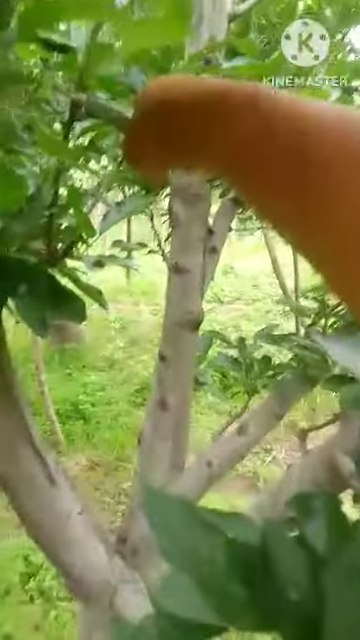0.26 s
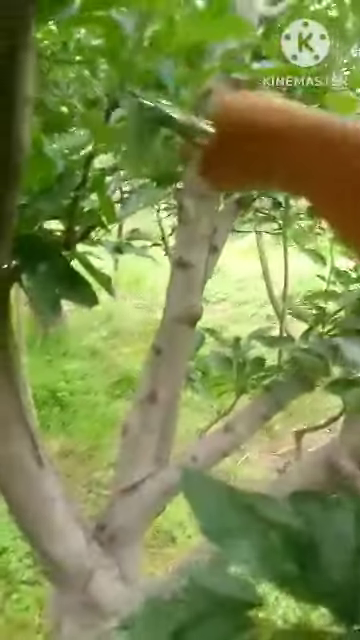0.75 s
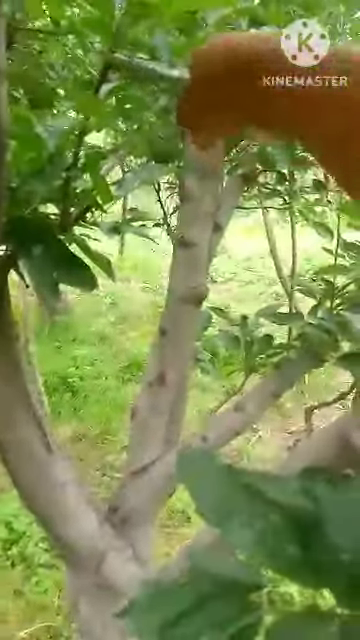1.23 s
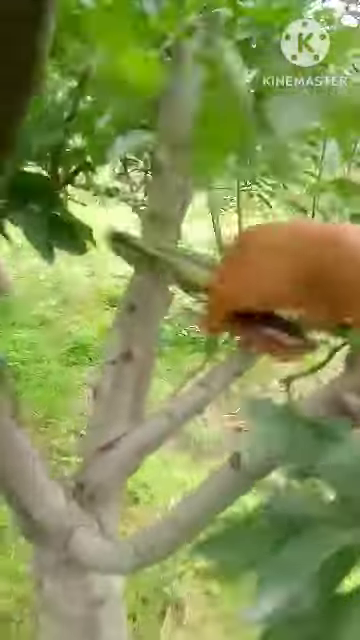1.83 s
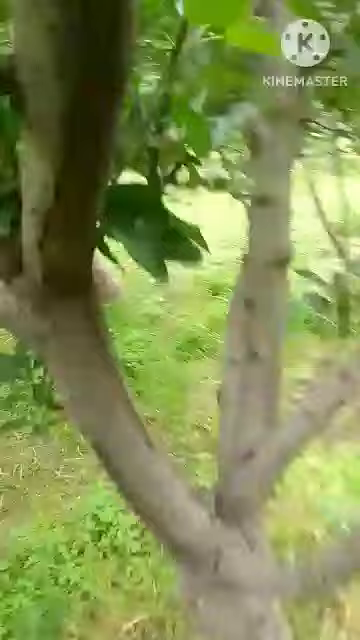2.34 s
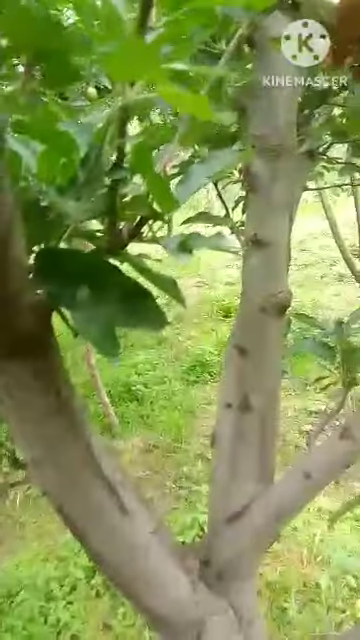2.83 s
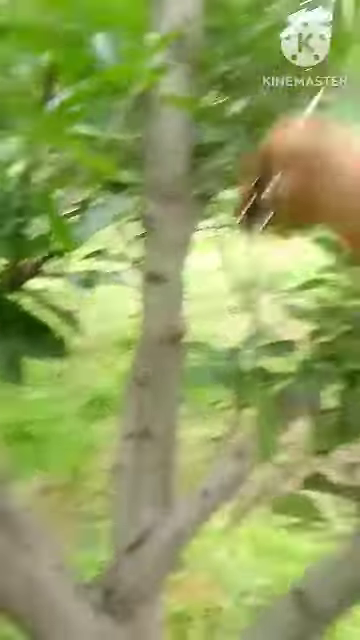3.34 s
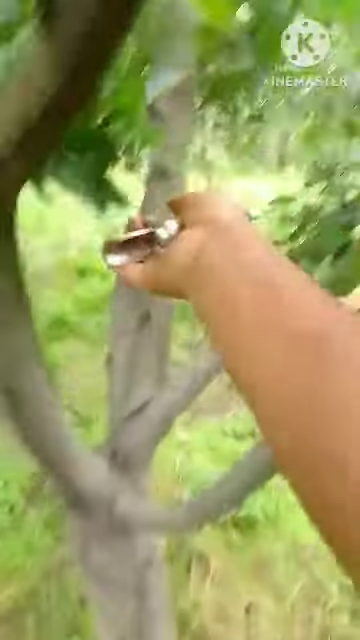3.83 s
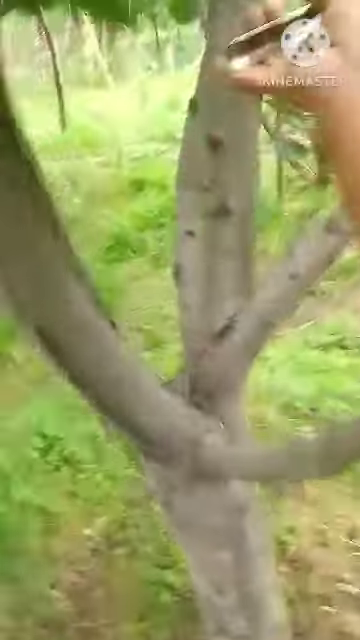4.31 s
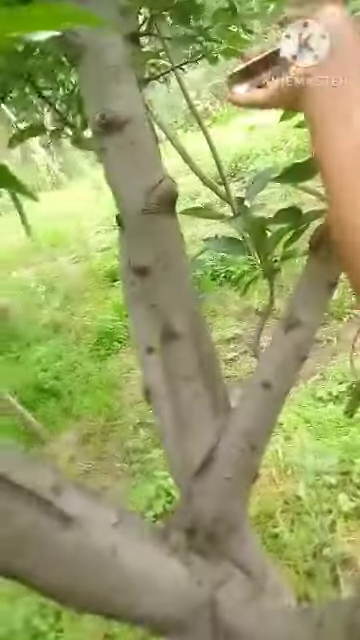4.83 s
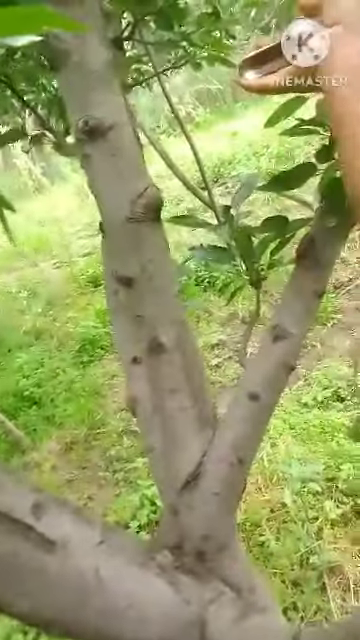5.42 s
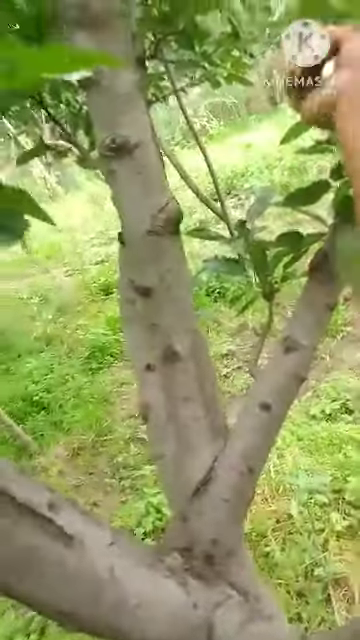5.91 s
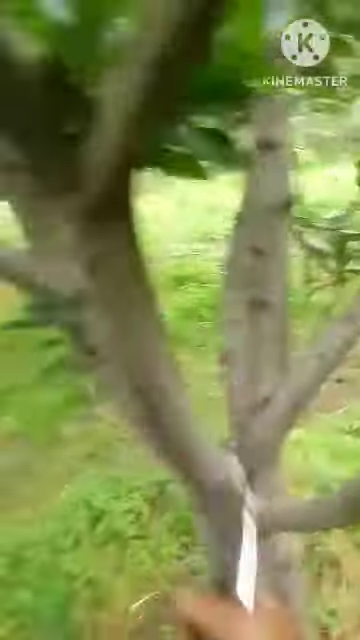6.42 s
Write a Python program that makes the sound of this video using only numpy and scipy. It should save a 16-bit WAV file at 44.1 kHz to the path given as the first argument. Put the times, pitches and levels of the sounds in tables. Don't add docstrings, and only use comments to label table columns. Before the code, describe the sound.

Close to a small microphone in a quiet orchard, pruning shears make three separate snips. Each begins with a creaking bite, claps shut in a hard, briefly ringing steel click, then scrapes open with spring hiss. Leaves rustle and twigs tick between them, wind puffs softly, and a palm rubs the microphone after the second cut. Behind is a faint wash and broad drone, with a tiny cricket chirp, then a faint dove and fly near the end.

```python
import sys
import numpy as np
from scipy import signal
from scipy.fft import rfft, irfft
from scipy.io import wavfile
from scipy.ndimage import uniform_filter1d

SR = 44100
rng = np.random.default_rng(int(sys.argv[2]) if len(sys.argv) > 2 else 0)


def boost_factor(decibels):
    exponent = np.asarray(decibels, float) / 20
    return 10 ** exponent


def wav_out(sig):
    wavfile.write(sys.argv[1], SR, np.round(np.clip(np.atleast_2d(sig).T, -1, 1) * 32767).astype(np.int16))


N = 293706
TIME = np.arange(N) / SR


def evened(x):
    return x / np.sqrt(np.mean(x ** 2) + 1e-20)


def along(rows, column=1):
    rows = np.asarray(rows)
    return np.interp(TIME, rows[:, 0], rows[:, column])


def level(rows, column=1):
    edge = np.minimum(TIME - rows[0][0], rows[-1][0] - TIME)
    return boost_factor(along(rows, column)) * np.clip(edge * 200, 0, 1)


def swells(rows, column=3):
    end_db = -20
    power = 0
    for row in rows:
        u = TIME - row[0]
        shape = np.where(u < 0, -u / row[1], (u / row[2]) ** 2)
        power = power + boost_factor(2 * row[column] + 2 * end_db * shape)
    return np.sqrt(power)


def wavering(size, count=N):
    once = uniform_filter1d(rng.standard_normal(count), size=size)
    return evened(uniform_filter1d(once, size=size))


def add(mix, s, sound):
    part = mix[round(s * SR):][:len(sound)]
    part += sound[:len(part)]


def resonate(x, hz, width):
    turn = np.exp(2j * np.pi * np.cumsum(hz * np.ones(len(x))) / SR)
    r = np.exp(-np.pi * width / SR)
    return 2 * (turn * signal.lfilter([1 - r], [1, -r], x / turn)).real


def resonate_twice(x, hz, width):
    return resonate(resonate(x, hz, width), hz, width)


def grains(per_s, spread_db):
    size = boost_factor(spread_db * np.minimum(rng.exponential(1, N), 4)) * rng.choice([-1., 1.], N)
    return evened(size * (rng.random(N) < per_s / SR))


def coloured(x, colour):
    f, db = np.transpose(colour)
    hz = np.fft.rfftfreq(N, 1 / SR)
    gain_db = np.interp(np.log(hz + 1), np.log(f), db, db[0] - 13.5, db[-1])
    return evened(irfft(rfft(x) * boost_factor(gain_db), N))


def hiss(colour, patchy_db, flicker_db):
    frames = N // 64 + 6
    a, b, patches = rng.standard_normal((frames, 129, 3)).T
    patches = evened(uniform_filter1d(uniform_filter1d(patches, size=4, axis=0), size=40, axis=1))
    flicker = evened(uniform_filter1d(rng.standard_normal(frames), size=6))
    z = (a + 1j * b) * boost_factor(patchy_db * patches + flicker_db * flicker)
    return coloured(signal.istft(z, nperseg=256, noverlap=192)[1][:N], colour)


def band(lo_hz, hi_hz):
    sos = signal.butter(4, [lo_hz, hi_hz], "band", fs=SR, output="sos")
    return evened(signal.sosfilt(sos, rng.standard_normal(N)))


def brief_dip(db):
    centre_s, length_s = 3.37, 0.076
    return boost_factor(db * np.exp(-((TIME - centre_s) / length_s) ** 2))


# (frequency [Hz], level [dB])
WASH_COLOUR = [(60, -3), (150, -0.5), (300, -2), (500, -1), (800, -4), (1600, -9.5), (4000, -21),
               (9000, -38)]
# (time [s], level [dB])
DRONE = [(0.0, -63), (1.9, -62), (3.1, -62.5), (3.6, -72.5), (4.5, -71), (5.3, -66.5), (5.8, -70),
         (6.4, -69), (6.66, -61.5)]
# (peak [s], rise [s], fall [s], low level [dB], middle level [dB])
SHOOT_FALLS = [
    (6.11, 0.22, 0.12, -53, -55.5),
]


def distance():
    drone_hz, width_hz = 1300, 410
    hz = drone_hz * (1 + 0.052 * wavering(size=4000))
    drone = resonate_twice(rng.standard_normal(N), hz, width_hz) * boost_factor(1.4 * wavering(size=1500))
    wash = hiss(WASH_COLOUR, patchy_db=0.8, flicker_db=0.8)
    drone_db = along(DRONE)
    wash_db = -61.5 + 0.26 * (drone_db - DRONE[0][1])
    low = np.hypot(boost_factor(wash_db) * brief_dip(-7.5), swells(SHOOT_FALLS))
    middle = np.hypot(boost_factor(drone_db), swells(SHOOT_FALLS, column=4))
    return low * wash + middle * evened(drone)


def faint_tone(rows, width_hz):
    hz = along(rows)
    tone = np.sqrt(2) * np.sin(2 * np.pi * np.cumsum(hz) / SR)
    fuzz = evened(resonate(rng.standard_normal(N), hz, width_hz))
    return level(rows, column=2) * (0.94 * tone + 0.59 * fuzz)


# (time [s], pitch [Hz], level [dB])
DOVE = [(5.68, 600, -73), (5.74, 610, -66), (5.9, 598, -69), (6.0, 596, -64)]


def dove():
    return faint_tone(DOVE, 15)


# (time [s], wingbeat [Hz], level [dB])
FLY = [(5.76, 171, -71), (5.936, 185.6, -66), (6.05, 175.1, -71), (6.4, 168, -69.5), (6.66, 164, -66)]


def fly():
    return faint_tone(FLY, 15)


def cricket():
    out, t = np.zeros(N), np.arange(150) / SR
    pip = boost_factor(-61.5) * np.hanning(len(t)) * np.sin(2 * np.pi * 6600 * t)
    for start_s, gap_s in ((2.385, 0.013), (2.49, 0.014)):
        for stroke in range(6):
            add(out, start_s + gap_s * (stroke + rng.uniform(-.2, .2)), pip)
    return out


# (time [s], level [dB])
BREEZE = [(0.0, -70), (2.3, -69), (2.6, -66), (3.2, -66), (4.5, -73), (5.6, -70.5), (6.66, -71)]
# (peak [s], rise [s], fall [s], level [dB])
GUSTS = [(.85, .6, 0.13, -65), (2.06, 0.18, .08, -61), (2.19, 0.14, 0.24, -60.5), (6.07, 0.37, 0.38, -70),
         (6.47, 0.18, 0.18, -57)]


def wind():
    colour = [(12, -19.5), (40, -5.5), (90, -8.5), (200, -13.5), (500, -43.0), (2000, -65.5)]  # (Hz, dB)
    puffs = coloured(rng.standard_normal(N), colour)
    return np.hypot(boost_factor(along(BREEZE)), swells(GUSTS)) * brief_dip(-14.5) * puffs


# (time [s], rustle level [dB])
RUSTLE = [(0.0, -64), (0.37, -65), (1.65, -63.5), (1.8, -63.5), (2.24, -55), (2.35, -59.5), (2.99, -62.5),
          (3.21, -62), (3.45, -60.5), (3.69, -56), (3.89, -63), (5.01, -66), (5.27, -64.5), (5.67, -67),
          (5.97, -65), (6.14, -61.5), (6.45, -59.5), (6.66, -56.5)]
# (peak [s], rise [s], fall [s], level
# [dB])
SWISHES = [(1.63, 0.054, 0.045, -76), (1.712, 0.013, .012, -67), (1.72, 0.067, 0.082, -66),
           (1.79, .08, 0.22, -71), (2.145, 0.036, 0.17, -69), (2.51, 0.12, .1, -78),
           (2.664, 0.25, 0.19, -73), (2.8, 0.065, .03, -72), (2.87, 0.032, 0.033, -66),
           (2.93, .03, .03, -75), (3.196, .008, .012, -78), (3.218, 0.0087, .012, -68),
           (3.26, .01, 0.014, -50), (3.28, 0.033, 0.12, -69), (3.392, .015, 0.054, -71),
           (3.544, 0.067, 0.2, -65.5), (3.8, .25, .13, -73), (4.012, .012, .07, -76),
           (4.802, 0.035, 0.021, -77), (6.035, 0.016, 0.037, -59.5), (6.14, 0.18, .06, -71),
           (6.22, .03, 0.09, -77), (6.45, .3, 0.59, -96)]
# (frequency [Hz], level [dB])
BODY_COLOUR = [(500, -18), (1200, -2.5), (2200, -0.5), (3500, 0.5), (4800, -2), (6000, -16), (9000, -27)]
EDGE_COLOUR = [(3500, -20), (6000, 3), (8000, -3.5), (10000, -8), (13000, -22), (15500, -24)]
SWISH_COLOUR = [(5000, -16), (8000, 3), (10000, -8.5), (12500, -1.5), (14000, -1.5), (15500, -8)]


def foliage():
    body = hiss(BODY_COLOUR, patchy_db=1.5, flicker_db=2.0)
    body = body + 0.27 * coloured(grains(per_s=130, spread_db=7.5), BODY_COLOUR)
    edge = hiss(EDGE_COLOUR, patchy_db=0.7, flicker_db=3.0)
    edge = edge + 0.22 * coloured(grains(per_s=80, spread_db=6.5), EDGE_COLOUR)
    sheen = hiss(SWISH_COLOUR, patchy_db=4.0, flicker_db=1.5)
    rustle_db, swish = along(RUSTLE), swells(SWISHES)
    edge_db = -79.5 + 0.86 * (rustle_db - rustle_db[0])
    brushing = np.hypot(boost_factor(edge_db), boost_factor(1.5) * swish)
    return boost_factor(rustle_db) * body + brushing * edge + swish * sheen


# (time [s], peak level [dB], pitch [Hz], share above 5 kHz [dB])
LEAF_TICKS = [(0.167, -41, 2050, -26), (0.2274, -48, 4400, -16), (0.5478, -43.5, 2850, -18),
              (0.636, -40, 3250, -20), (1.1461, -41.5, 4000, -28), (1.2832, -49, 6300, -8),
              (1.333, -50, 5160, -18), (1.4206, -37, 2530, -36), (1.458, -43, 3860, -27),
              (1.6132, -43, 4300, -16), (1.627, -44.5, 2690, -12), (1.89, -41, 2810, -13),
              (2.011, -43.5, 3320, -17.5), (2.062, -40, 4120, -15.5), (2.15, -46.5, 4120, -6),
              (2.185, -39.5, 4140, -20), (2.2874, -45, 4430, -12), (2.843, -41, 4040, 2),
              (2.8697, -42, 2220, -7), (2.920, -39.5, 3950, -18), (3.3938, -50, 1970, 3),
              (3.5212, -39, 1700, -6), (3.557, -38, 2420, -16), (3.899, -47, 1900, -13),
              (1.52, -50, 3900, -20), (0.107, -45, 3500, -21), (4.6295, -42.5, 3800, -32),
              (4.874, -44, 1490, -30), (3.57, -40, 3050, -11), (3.6084, -37, 2060, -22),
              (3.666, -41, 2600, -13), (3.759, -36.5, 3700, -22), (4.6287, -40.5, 2190, -37.5),
              (5.4156, -44, 3210, -30), (5.7295, -43.5, 2530, -33.5), (6.3944, -46, 2400, -19)]
# (time [s], peak level [dB], pitch [Hz])
TWIG_KNOCKS = [(0.087, -40, 526), (0.634, -42.5, 1000), (1.457, -40, 1450), (2.163, -43, 1450),
               (2.273, -45, 420), (2.332, -38.5, 1370), (2.338, -38.5, 1250), (2.364, -42, 1250),
               (2.369, -42, 1600), (2.443, -42, 1240), (2.646, -39, 1310), (2.011, -42, 1160),
               (3.521, -41, 215), (3.538, -44, 480), (3.548, -44, 250), (3.607, -41.5, 856),
               (3.613, -50.5, 260), (4.788, -49, 900), (4.809, -44, 1400), (4.816, -50, 1300),
               (4.629, -48, 1000), (5.414, -41.5, 1227)]


def ticks():
    rows = [(*tick, 0.011) for tick in LEAF_TICKS]
    rows += [(*knock, -37, 0.025) for knock in TWIG_KNOCKS]
    out, t = np.zeros(N), np.arange(1200) / SR
    snaps, edges = band(1050, 4200), band(7350, 9060)
    onset = np.sin(np.pi / 2 * np.minimum(t / 0.00033, 1)) ** 2
    for (s, db, hz, bright_db, t60), chance in zip(rows, rng.random((len(rows), 10))):
        ring = 0
        for k, (shift, phase) in enumerate(chance.reshape(5, 2)):
            octaves = 0.8 * ((k + shift) / 5 - .5)
            ring = ring + np.sin(2 * np.pi * (hz * 2 ** octaves * t + phase))
        now = slice(round(s * SR), round(s * SR) + len(t))
        snap = (0.4 * snaps[now] + boost_factor(bright_db) * edges[now]) * np.exp(-t / 0.0023)
        sound = (ring / 2 + snap) * boost_factor(-60 * t / t60) * onset
        add(out, s, boost_factor(db) * sound / abs(sound).max())
    return out


# (peak [s], rise [s], fall [s], level [dB])
HAND_SHIFTS = [(3.352, .025, .045, -56), (3.415, .035, .05, -56), (3.44, .1, .06, -61),
               (3.495, .05, .04, -56), (3.53, .045, .05, -52.5)]
# (time [s], frequency [Hz])
HAND_PITCH = [
    (3.45, 281.6),
    (3.55, 223),
]


def handling():
    hz = along(HAND_PITCH)
    rub = evened(resonate_twice(grains(per_s=3000, spread_db=1.5), hz, 170))
    hum = np.sin(2 * np.pi * np.cumsum(hz) / SR)
    return swells(HAND_SHIFTS) * (.55 * rub + 0.59 * hum)


# (peak [s], rise [s], fall [s], level [dB])
SPRING_SLIDES = [
    (3.275, .012, 0.25, -66.5),
    (3.56, 0.047, 0.32, -59.5),
    (3.635, 0.064, 0.069, -60),
    (6.12, 0.13, 0.097, -60.5),
]
# (frequency [Hz], width [Hz], level [dB])
COIL = [(8950, 600, 6), (9000, 520, -5)]
# (time [s], level [dB], pitch [Hz])
BOLT_SQUEAL = [(6.065, -82, 13150), (6.12, -71, 13150), (6.185, -77, 13150), (6.24, -85, 13000)]


def spring():
    scrape = grains(per_s=1400, spread_db=3.5)
    tone = sum(boost_factor(db) * resonate_twice(scrape, hz, width) for hz, width, db in COIL)
    squeal = resonate(grains(per_s=900, spread_db=2.0), along(BOLT_SQUEAL, column=2), 70)
    return evened(tone) * swells(SPRING_SLIDES) + level(BOLT_SQUEAL) * evened(squeal)


# (centre [s], length [s], peak level [dB], pitch [Hz])
JOLTS = [(1.712, 0.011, -32.5, 370), (1.7125, 0.0073, -37, 900), (1.723, .01, -46, 380),
         (3.2607, .009, -34, 443), (3.261, 0.015, -44.5, 179), (6.0222, 0.0069, -33, 480),
         (6.021, 0.0071, -38.5, 870), (6.028, .008, -47, 500), (6.098, .008, -46, 453),
         (6.134, 0.0071, -47, 500)]


def jolts():
    out = np.zeros(N)
    for s, length, db, hz in JOLTS:
        t = np.arange(-length / 2, length / 2, 1 / SR)
        push = np.cos(np.pi * t / length) ** 2 * np.cos(2 * np.pi * hz * t)
        add(out, s - length / 2, boost_factor(db) * push)
    return out


# (peak [s], rise [s], fall [s], rub at handle end [dB], rub at tip [dB])
RUBS = [
    [(1.68, 0.023, 0.031, -56, -41), (1.705, 0.039, 0.026, -39, -45), (1.73, .03, 0.17, -49, -52.5),
     (1.87, .07, 0.073, -53.5, -59.5)],
    [(3.2, 0.02, .03, -54.5, -50.5), (3.252, 0.013, 0.026, -40, -35), (3.28, .035, 0.12, -52, -50),
     (3.33, .06, 0.16, -62, -59.5)],
    [(5.992, 0.0085, 0.033, -50, -46.5), (6.025, 0.012, 0.061, -42, -46), (6.06, .04, 0.16, -51.5, -55),
     (6.115, .07, 0.055, -58, -49.5)],
]
# (frequency [Hz], width [Hz], level [dB])
SLIDE_MODES = [
    [(1810, 210, -5), (2400, 225, -1.5), (2600, 240, -1), (2950, 240, -0.5), (3740, 300, 1),
     (4080, 260, 0.5), (4500, 330, -2), (4920, 320, -5)],
    [(1730, 280, 0.5), (2070, 280, 2), (2490, 287, -2), (2800, 260, -3), (3500, 300, -2.5), (3900, 350, 1),
     (4410, 300, -0.5), (4800, 280, 1), (5150, 300, -1), (5700, 400, -9)],
    [(1920, 240, 1), (2300, 200, -6), (2540, 200, -3), (2920, 180, 1), (3600, 350, -9), (4140, 250, -8),
     (4540, 290, 0), (4750, 200, -2), (5240, 250, -13)],
]


def rubbing(rub, slide):
    out, first = np.zeros(N), round(rub[0][0] * SR)
    now = slice(first - SR // 10, first + SR // 2)
    slips = grains(per_s=5000, spread_db=2.0) * boost_factor(1.0 * wavering(size=200))
    slips = slips[now]
    ends = np.zeros((2, len(slips)))
    for peak_hz, width, peak_db in slide:
        drift_hz = peak_hz * (1 + .02 * wavering(size=900, count=len(slips)))
        ring = evened(resonate_twice(slips, drift_hz, width))
        end = int(peak_hz > 3300)
        ends[end] += boost_factor(peak_db + 1.5 * wavering(size=250, count=len(slips))) * ring
    handle, tip = evened(ends[0]), evened(ends[1])
    out[now] += swells(rub)[now] * handle + swells(rub, column=4)[now] * tip
    return out


# (frequency [Hz], level [dB], t60 [s])
FIRST_STEEL = [(1430, -27.5, 0.023), (1956, -6.5, 0.057), (2504, 4.5, 0.026), (2690, 0.5, 0.027),
               (2840, 5.5, 0.016), (3590, -26, 0.0198), (3830, -13.5, 0.025), (4500, -5, .02),
               (4900, -2.5, 0.037), (6710, -3, 0.024), (8670, -35.5, .011)]
SECOND_STEEL = [(1318, -49, 0.0033), (1780, -14, 0.077), (2020, -10, 0.039), (2420, -7.5, 0.02),
                (2627, 1, 0.02), (3793, 1.5, 0.015), (4000, -14, .018), (4530, -1.5, 0.019),
                (4754, 1, 0.024), (5140, -3.5, 0.0218), (5750, -2, 0.011), (2834, -5, 0.016),
                (6900, -16.5, .014), (8490, -12, 0.016)]
THIRD_STEEL = [(900, -22, 0.02), (3620, -14, 0.022), (1240, -9, 0.026), (1920, -13.5, 0.073),
               (2355, 2, 0.023), (2500, -13, 0.033), (2837, 3, 0.019), (4290, 4, 0.0092), (4530, 5.5, 0.01),
               (4680, -7, 0.032), (5030, 4, 0.013), (5590, -2.5, 0.015), (6700, -7, 0.02),
               (8670, 13, 0.014)]
# (time [s], peak level [dB], pitch the struck spot favours [Hz], edge click [dB])
FIRST_BLOWS = [(1.6788, -29.5, 2900, -20), (1.6868, -31, 3500, -21), (1.6957, -28.5, 3000, -12.5),
               (1.7072, -16, 2750, -18), (1.7088, -18, 2900, -26), (1.7113, -3, 2700, -24),
               (1.7134, -7.5, 2400, -26), (1.7145, -26, 4900, -28.5), (1.716, -22, 2200, -31.5),
               (1.718, -22, 2000, -30), (1.7202, -22.5, 2200, -28), (1.7224, -26, 2300, -28.5),
               (1.7295, -33, 2200, -10), (1.7385, -41, 2400, -18), (1.7553, -33, 3400, -12),
               (1.7595, -34, 3800, -22), (1.774, -42, 3000, -18), (1.784, -40, 2500, -22),
               (1.807, -47, 2500, -20), (1.831, -48, 4500, -4), (1.838, -44, 2400, -22),
               (1.874, -51, 2950, -22), (1.89, -53, 1450, 0)]
SECOND_BLOWS = [(3.1906, -32, 3000, -12), (3.1953, -26, 4580, -12), (3.1957, -33, 2900, -19.5),
                (3.217, -30.5, 4800, -10.5), (3.2177, -36, 2800, -19.5), (3.241, -32, 2700, -22),
                (3.2502, -28, 4750, -27.5), (3.253, -35, 2700, -29.5), (3.2558, -18.5, 3800, -24),
                (3.257, -20, 4600, -28), (3.2569, -17.5, 2650, -29), (3.2592, -1, 3830, -20),
                (3.2621, -19, 5100, -30.5), (3.2631, -21.5, 2050, -27.5), (3.267, -26, 2500, -27),
                (3.2725, -35, 5100, -26), (3.2805, -37, 4500, -18), (3.302, -42, 2100, -20),
                (3.313, -45, 2050, -20), (3.324, -42, 4300, -12), (3.337, -46, 4700, -18),
                (3.345, -46, 2400, -20), (3.361, -47, 2500, -9), (3.404, -51, 2400, -16),
                (3.416, -57, 2050, -18), (3.43, -55, 4700, -18)]
THIRD_BLOWS = [(5.9905, -40, 3180, -23), (5.9988, -33, 3470, -22), (6.003, -33, 2500, -15),
               (6.0142, -36, 2600, -28), (6.017, -29, 2700, -26), (6.018, -19, 4400, -20),
               (6.0192, -21, 2900, -27), (6.0208, -10.5, 2940, -12), (6.0215, -22, 2300, -19),
               (6.0238, -25, 4600, -28), (6.0259, -17.5, 2350, -28), (6.028, -24, 2200, -28),
               (6.0342, -35, 2200, -28), (6.0405, -30, 2350, -26), (6.0425, -35, 4500, -26),
               (6.06, -39, 1920, -28), (6.0725, -34, 2800, -24), (6.0758, -35, 1300, -15),
               (6.0902, -34.5, 2600, -11), (6.0972, -38, 1900, -17), (6.0985, -39, 4600, -20),
               (6.1176, -42, 1300, -20), (6.1228, -35.5, 1250, -22), (6.132, -39, 1410, -14),
               (6.1356, -36, 1250, -22), (6.179, -41, 1660, -6)]
# (factor for a light blow [ratio], added by each dB more [ratio/dB])
RING_LENGTHS = [(.68, -.016), (.62, -.006), (.45, .015)]


def blade_blows(modes, blows, lasting):
    t = np.arange(4000) / SR
    hz, db, t60 = np.transpose(modes)[:, :, None]
    light_db, focus_db, focus_of_light = -30, 7.5, .6
    onset = np.sin(np.pi / 2 * np.minimum(t / .001, 1)) ** 2
    click_band = signal.butter(2, [3500, 9500], "band", fs=SR)
    out = np.zeros(N)
    for s, peak_db, spot_hz, click_db in blows:
        length = max(lasting[0] + lasting[1] * (peak_db - light_db), .25)
        loss_db = (focus_db - focus_of_light * peak_db) * np.log2(hz / spot_hz) ** 2
        rings = boost_factor(db - loss_db - 60 * t / (length * t60)) * np.sin(2 * np.pi * hz * t)
        blow = (rings * onset).sum(0)
        click = signal.lfilter(*click_band, rng.standard_normal(len(t))) * np.exp(-t / 0.0025)
        add(out, s, boost_factor(peak_db) * (blow / abs(blow).max() + boost_factor(click_db) * click))
    return out


# (frequency [Hz], width [Hz])
HAND_NOTCHES = [
    (4170, 95),
    (3050, 340),
    (3170, 240),
]


def shears():
    steel = FIRST_STEEL, SECOND_STEEL, THIRD_STEEL
    blows = FIRST_BLOWS, SECOND_BLOWS, THIRD_BLOWS
    out = np.zeros(N)
    for k in range(3):
        snip = blade_blows(steel[k], blows[k], RING_LENGTHS[k]) + rubbing(RUBS[k], SLIDE_MODES[k])
        notch_hz, width_hz = HAND_NOTCHES[k]
        snip = signal.lfilter(*signal.iirnotch(notch_hz, notch_hz / width_hz, fs=SR), snip)
        out += signal.lfilter(*signal.butter(2, 130, "high", fs=SR), snip)
    return out


def trees(x):
    t = np.arange(12000) / SR
    taps = rng.choice([-1., 1.], len(t)) * (rng.random(len(t)) < 2500 / SR)
    taps = taps * boost_factor(-60 * t / 0.16) * (t > .005)
    return signal.oaconvolve(x, taps / np.linalg.norm(taps))[:N]


def scene():
    far = distance() + dove() + fly() + cricket()
    around = wind() + foliage() + ticks() + handling()
    tool = shears()
    close = spring() + jolts() + tool + boost_factor(-18.5) * trees(tool)
    return (far + around + close)[None]


def low_pass(x):
    return signal.sosfilt(signal.butter(12, 16250, fs=SR, output="sos"), x)


def record(dry):
    noisy = dry + boost_factor(-85) * rng.standard_normal(dry.shape)
    lowpass = signal.firwin(255, 15900, window=("kaiser", 9), fs=SR)
    limited = signal.oaconvolve(noisy, lowpass[None], "same")
    return low_pass(limited - .0004)


dry = scene()
out = record(dry)
wav_out(out)
```